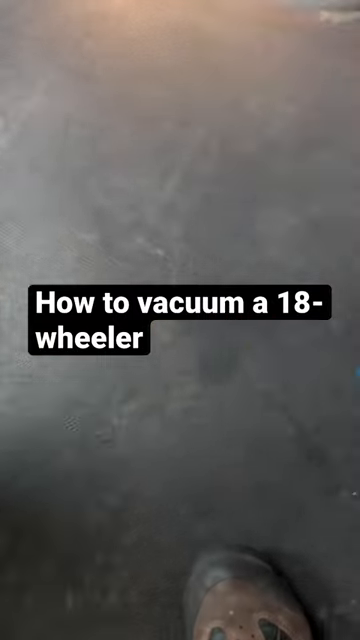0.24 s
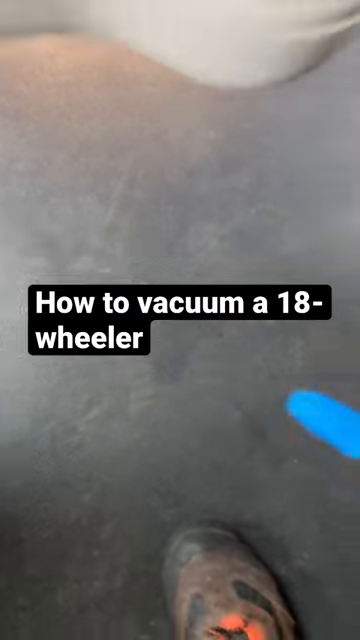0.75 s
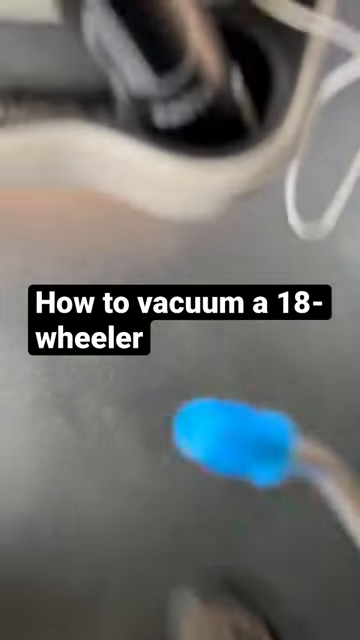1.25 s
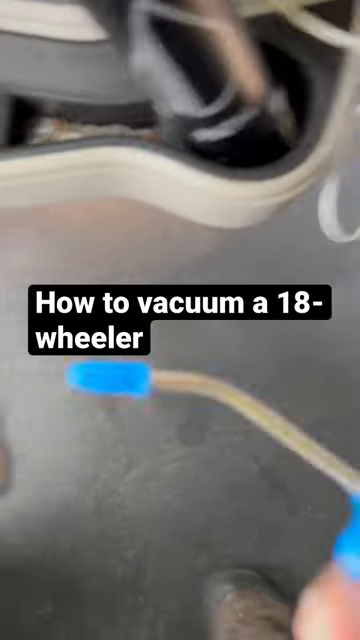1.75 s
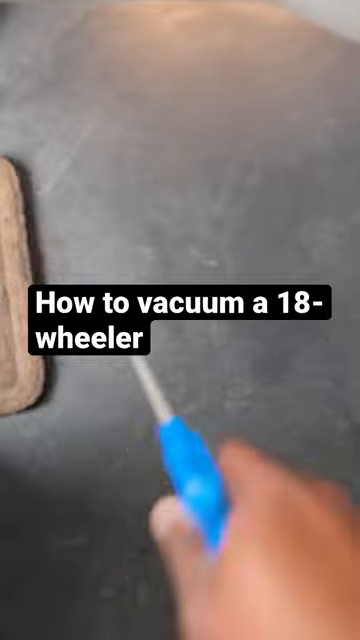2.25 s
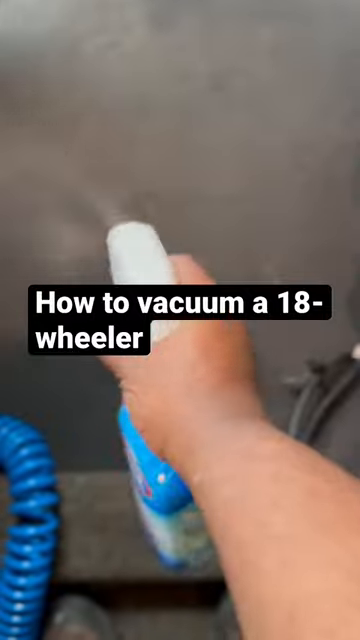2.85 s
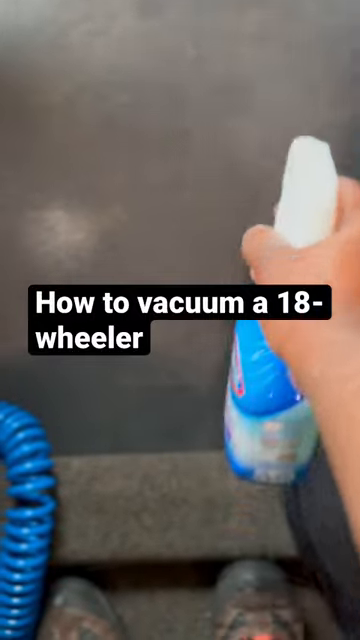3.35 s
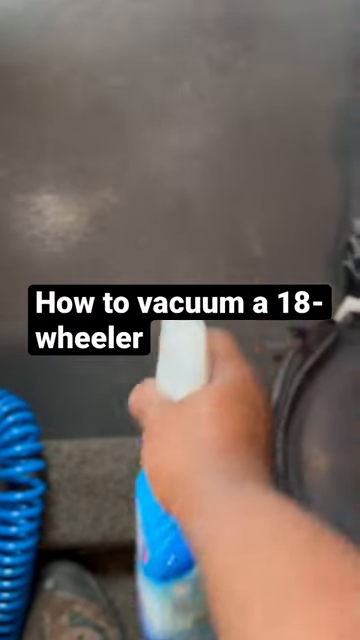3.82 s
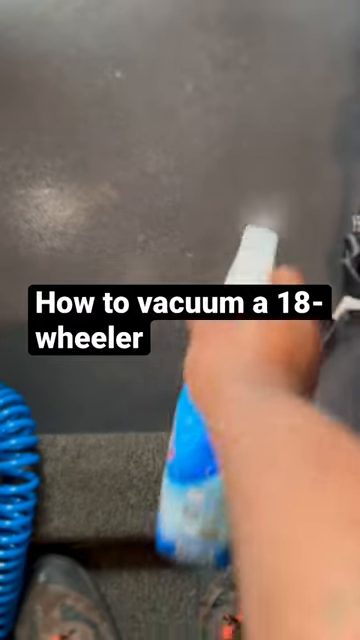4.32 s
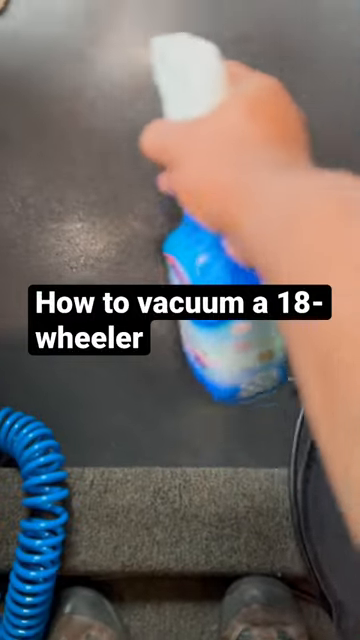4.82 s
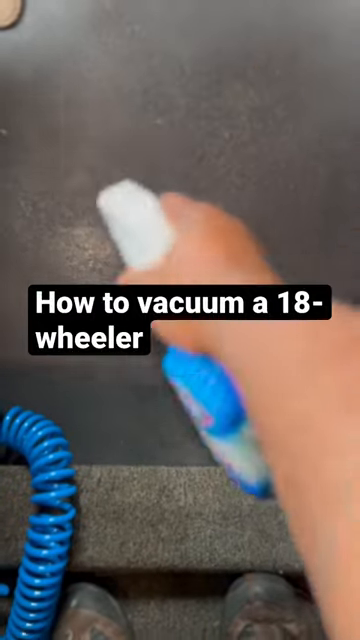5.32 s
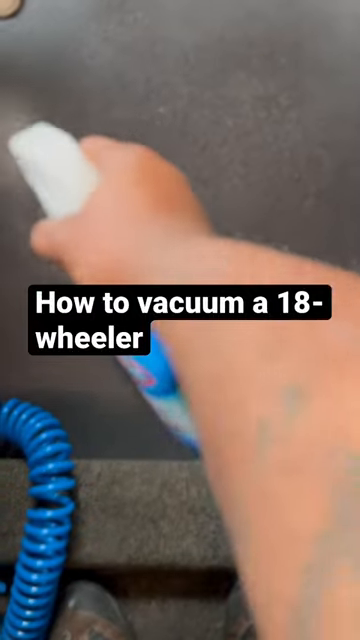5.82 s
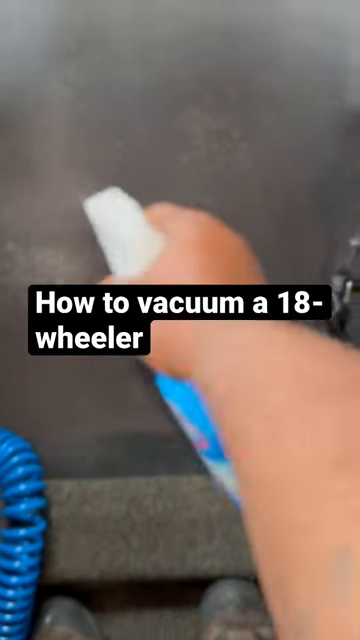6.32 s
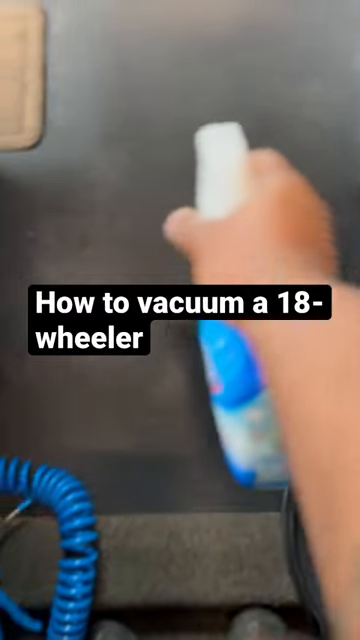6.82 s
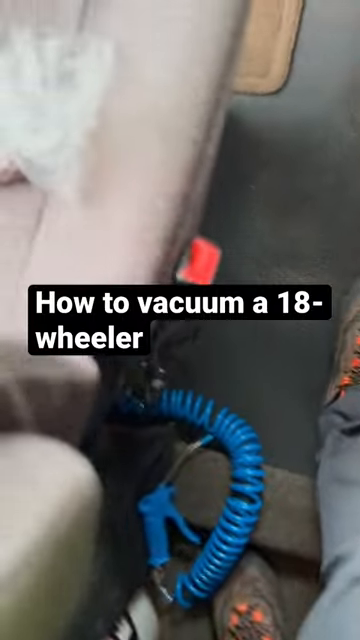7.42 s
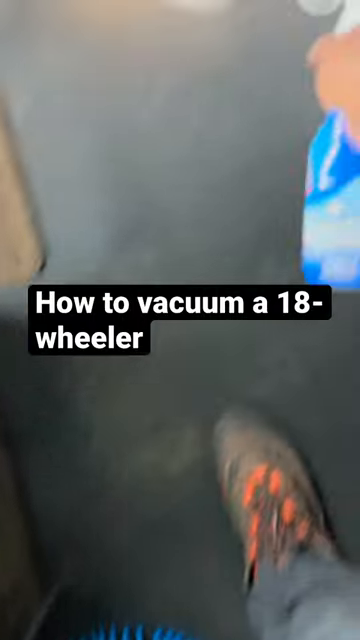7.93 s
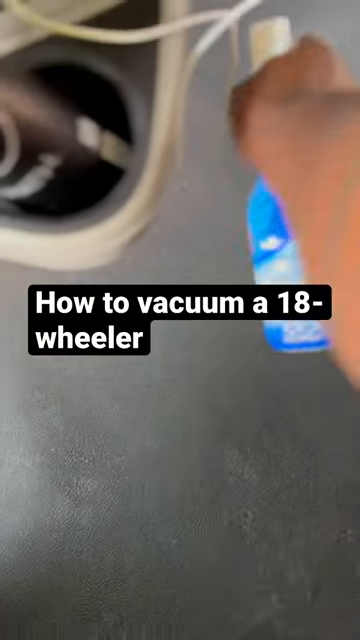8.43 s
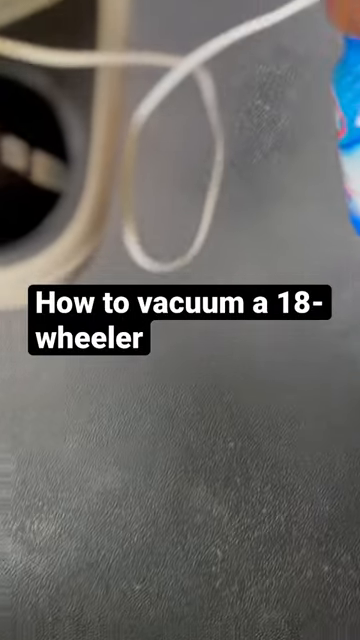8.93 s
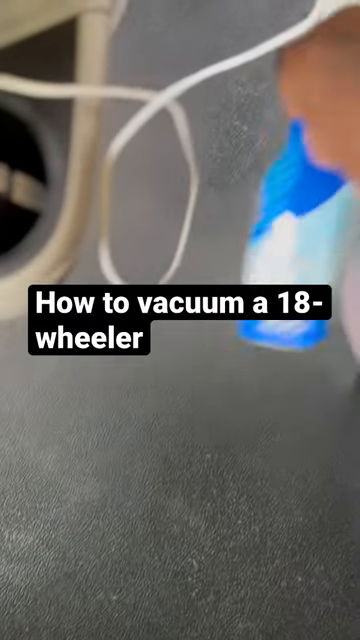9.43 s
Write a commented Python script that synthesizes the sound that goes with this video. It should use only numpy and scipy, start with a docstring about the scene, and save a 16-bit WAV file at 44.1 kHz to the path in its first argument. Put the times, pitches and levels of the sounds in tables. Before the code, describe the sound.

Inside a truck cab, a blow gun hisses loudly up close over a muffled diesel idle. Its air jet sweeps across the microphone in rough gusts, then weakens and sputters. The engine suddenly sounds louder, booming and clattering, while a trigger bottle sprays a quick run of short, misty squirts with small clicks. Cloth rustles with soft bumps and a plastic tap, then the spraying resumes over the idle.

```python
"""Cleaning a truck cab, engine idling.

A blow gun hisses close by, sweeps its air jet across the stereo microphone and sputters. Then the scene
changes: nearer the open door, a trigger bottle spits and mists cleaner stroke after stroke; in a pause the
driver shifts about and knocks something small. Under the floor a six-cylinder diesel booms throughout, muffled
at first, then louder by the door, where its valves clatter and its gears whine."""
import sys
import numpy as np
from scipy import signal
from scipy.fft import rfft, irfft, next_fast_len
from scipy.io import wavfile
from scipy.ndimage import uniform_filter1d, map_coordinates

SR = 44100
rng = np.random.default_rng(int(sys.argv[2]) if len(sys.argv) > 2 else 0)


def waveform_to_disk(signal):
    """Save audio, clipped to [-1, 1], as 16-bit WAV at the path in sys.argv[1]."""
    frames = np.transpose(np.atleast_2d(signal))
    scaled = np.clip(frames, -1, 1) * 32767
    samples = np.round(scaled).astype(np.int16)
    wavfile.write(sys.argv[1], SR, samples)


N = 426004
TIME = np.arange(N) / SR
DOOR_S = 2.425  # the scene changes here; the second scene is by the open door
CYCLE_S, FIRST_KNOCK_S = .2, .158  # all six cylinders fire once a cycle

# The engine at the microphone. Each row: time in seconds, then boom, body rumble and whirr in dB.
IDLE = [(0, -46.5, -50, -67), (1.1, -48, -48.5, -66), (1.7, -48, -55, -58), (1.85, -61, -62, -86),
        (2.42, -49, -55, -56), (2.43, -33.5, -36.5, -45), (3.0, -34, -35.5, -47.5),
        (3.7, -31.5, -34.5, -45), (4.9, -30, -33, -44), (5.9, -28.5, -32.5, -42.5),
        (6.9, -28, -31.5, -42.5), (7.42, -24.5, -30.5, -42.5), (7.75, -25.5, -29, -41.5),
        (8.4, -23.5, -27.5, -39.5), (9.0, -25, -28, -40.5), (9.66, -22, -27.5, -39.5)]
# How alike the left and right channels are. Each row: frequency in Hz, likeness from 0 to 1.
NEAR = [(100, 0.99), (400, 1), (850, 1), (1300, 1), (2200, 1), (3000, 0.43), (4700, 0.36), (5600, 0.7),
        (9300, 0.38), (10500, 1), (13600, 1), (14500, 0.6)]  # for sources close by
AROUND = [(60, 1), (130, 1), (250, 1), (500, 0.92), (950, 0.52), (1900, 0.88), (2600, 0.068), (5100, 0.11),
          (5700, 0.5), (9300, 0.72), (10500, 0.98), (13900, 1), (15000, .7)]  # for sound that fills the cab


def amp(db):
    return 10 ** (np.asarray(db) / 20)


def unit(x):
    return x / np.sqrt(np.mean(x ** 2) + 1e-20)


def along(points, hz):
    """Read (Hz, value) points on a log frequency axis."""
    freqs, values = np.transpose(points)
    return np.interp(np.log(hz + 1), np.log(freqs + 1), values)


def curves(rows):
    """One value per sample for each column after the time."""
    times, *columns = np.transpose(rows)
    return [np.interp(TIME, times, column) for column in columns]


def wobble(rate):
    """A smooth random curve, rate knots a second."""
    return map_coordinates(rng.standard_normal(int(N * rate / SR) + 4), [TIME * rate])


def filtered(x, response):
    """Filter x by a complex response of frequency."""
    size = next_fast_len(N + 8192)
    return irfft(rfft(x, size) * response(np.fft.rfftfreq(size, 1 / SR)), size)[..., :N]


def rush(spectrum, alike, patchy_db, source=None):
    """Stereo noise of rms 1 with patches of random gain; silent below its spectrum."""
    bins = signal.stft(rng.standard_normal((2, N)) if source is None else source, nperseg=512)[2]
    patches = uniform_filter1d(rng.standard_normal(bins.shape[1:]), size=6, axis=0)
    patches = uniform_filter1d(patches, size=8, axis=1)
    pair = signal.istft(bins * amp(patchy_db * unit(patches)), nperseg=512)[1][:, :N]
    closed = [(spectrum[0][0] / 2, -120), *spectrum]
    width = lambda hz: np.arccos(np.clip(along(alike, hz), 0, 1)) / 2
    mid, side = filtered(pair, lambda hz: amp(along(closed, hz)) * [np.cos(width(hz)), np.sin(width(hz))])
    return unit(np.array([mid + side, mid - side]))


def bursts(rows, rise, fall):
    """Envelope of (seconds, dB) bursts: a bell-shaped rise, an exponential fall."""
    out, t = np.zeros(N + SR), np.arange(-SR // 50, SR // 10) / SR
    shape = np.where(t < 0, np.exp(-(t / rise) ** 2), np.exp(-t / fall))
    for start, db in rows:
        out[max(round(start * SR) - SR // 50, 0):][:len(t)] += amp(db) * shape
    return out[:N]


def struck(start, db, hz, t60):
    """One decaying tone from a knock."""
    age = np.clip(TIME - start, 0, None)
    return amp(db - 60 * age / t60) * np.sin(2 * np.pi * hz * age)


def by_place(table):
    """Level curves in dB: the body rumble plus each row's value at the place the microphone faces."""
    # The microphone turns. Each row: time in seconds, place (0 door, 1 seat, 2 dashboard).
    facing = [(2.43, 0.066), (6.3, 0), (6.62, 1), (7.05, 1), (7.25, 1.3), (7.75, 1.63), (8.2, 2.04),
              (9.66, 2.08)]
    place, = curves(facing)
    return [curves(IDLE)[1] + np.interp(place, range(3), row) for row in table]


def blow_gun():
    """The nozzle hisses; the jet splashes on surfaces and buffets the microphone in gusts."""
    # Each row: time in seconds, then nozzle hiss, jet on surfaces and jet on the microphone in dB.
    sweep = [(0.0, -19.5, -43, -62), (0.2, -20.5, -43, -63), (0.37, -16, -33.5, -56),
             (0.47, -17.5, -36.5, -59), (0.63, -19, -42, -63), (0.75, -14, -28.5, -39),
             (0.84, -16.5, -33.5, -46), (0.9, -13.5, -22.5, -34.5), (1.0, -13.5, -29.5, -42),
             (1.09, -11.5, -24, -37), (1.105, -15, -17.5, -38), (1.125, -13, -19, -33),
             (1.15, -15, -17, -21.5), (1.22, -15, -16, -21), (1.27, -18, -16, -19),
             (1.31, -15.5, -16.5, -20.5), (1.35, -16.5, -22.5, -21), (1.385, -17, -21, -22.5),
             (1.45, -16, -17, -21), (1.52, -16, -20, -19.5), (1.58, -16, -18, -17), (1.63, -17, -19, -21),
             (1.68, -16.5, -22, -23), (1.73, -20.5, -28, -35.5), (1.76, -28, -50, -54),
             (1.8, -31, -60, -72), (2.0, -28.5, -51.5, -65), (2.035, -25, -37, -46),
             (2.09, -25, -39, -46.5), (2.135, -27, -46, -43), (2.19, -28, -51, -66),
             (2.27, -24.5, -46, -54), (2.295, -27, -58, -68), (2.33, -23, -38, -39), (2.4, -26.5, -54, -65),
             (2.425, -29.5, -49, -53)]
    # Each row: time in seconds, level in dB.
    air_slaps = [(2.034, -31), (2.056, -34), (2.066, -28), (2.076, -30), (2.088, -28), (2.098, -34),
                 (2.113, -36), (2.127, -34), (2.148, -31), (2.173, -44), (2.228, -31), (2.263, -33),
                 (2.27, -39), (2.317, -35), (2.332, -31), (2.36, -38)]  # the gun sputters
    head_on = [(1.04, -95), (1.08, -53), (1.14, -32.5), (1.2, -27), (1.3, -28.5), (1.37, -36), (1.48, -19),
               (1.52, -22), (1.57, -22.5), (1.63, -23), (1.68, -22.5), (1.72, -51), (1.75, -93)]  # a hollow roar when the jet points almost at the microphone
    # Spectra of the air. Each row: frequency in Hz, relative level in dB.
    nozzle_spectrum = [(900, -28), (2000, -11.5), (4000, -4.5), (6000, -1), (8000, -0.5), (10000, -1.5),
                       (13000, 0.5), (15500, 1.5)]
    splash_spectrum = [(200, -29), (600, -3), (1200, 0), (2400, 0.5), (4000, -4.5), (7000, -6),
                       (12000, -32)]
    buffet_spectrum = [(25, -26), (60, 0.5), (150, -1.5), (350, -5), (600, -6), (1200, -21.5)]
    roar_spectrum = [(130, -15), (260, -2.5), (390, 0.5), (520, -9), (800, -16), (1200, -60)]
    # How alike left and right are for the jet. Each row: frequency in Hz, likeness from 0 to 1.
    close = [(380, 1), (850, 0.89), (1300, 1), (2600, 1), (3400, 0.94), (4700, 0.81), (5600, 0.65),
             (9300, 1), (10500, 1)]
    hiss_db, splash_db, buffet_db = curves(sweep)
    treble_db = -2.5 - .27 * (splash_db - hiss_db)  # duller as the jet turns toward the microphone
    nozzle = rush(nozzle_spectrum, NEAR, patchy_db=1.5)
    treble = filtered(nozzle, lambda hz: 1 / (1 + (9000 / (hz + 1)) ** 6))
    hiss = amp(hiss_db + .63 * wobble(24.93)) * (nozzle + (amp(treble_db) - 1) * treble)
    gust = wobble(40.38)
    slaps = bursts(air_slaps, rise=.0007, fall=.002)
    thuds = amp(-7) * bursts(air_slaps, rise=.002, fall=.006)
    splash = (amp(splash_db + .7 * gust) + slaps) * rush(splash_spectrum, close, patchy_db=1.63)
    buffet = (amp(buffet_db + 1.9 * gust) + thuds) * rush(buffet_spectrum, close, patchy_db=1.5)
    roar = amp(curves(head_on)[0] + 1.1 * wobble(29.83)) * rush(roar_spectrum, close, patchy_db=2.5)
    return (TIME < DOOR_S) * (hiss + splash + buffet + roar)


def spray_bottle():
    """A squeeze spits trapped air and mists while the pump travels; the trigger clicks back."""
    # Each row: start and length in seconds, relative mist level in dB, click delay in seconds, click dB.
    strokes = [(2.544, .1, -43.5, .12, -45), (2.757, .079, -42.5, .121, -46),
               (2.957, 0.096, -42.5, 0.15, -51), (3.177, 0.093, -41.5, .14, -50),
               (3.384, 0.095, -40, .145, -43), (3.599, 0.096, -42.5, .148, -45),
               (3.863, .083, -41, .141, -46), (4.09, 0.095, -40.5, .154, -42), (4.333, .08, -39, .131, -42),
               (4.528, .091, -41, .148, -43), (4.739, 0.087, -40, .136, -51),
               (4.941, 0.095, -40.5, .143, -41), (5.152, .094, -39.5, .15, -41),
               (5.379, 0.081, -37.5, .146, -39), (5.607, 0.089, -38, .144, -44),
               (5.817, 0.092, -38.5, .144, -37), (6.021, 0.084, -37.5, .142, -46),
               (6.217, 0.07, -37, .144, -56), (8.027, 0.1, -40, .12, -40), (8.277, 0.11, -42.5, .17, -40),
               (8.542, .11, -41, 0.16, -42), (8.768, .11, -40.5, .156, -37),
               (9.004, 0.11, -38.5, .155, -39), (9.239, .1, -40, .168, -48), (9.624, 0.081, -40, .15, -48)]
    # Air escaping early in a stroke. Each row: time in seconds, relative peak in dB.
    spits = [(2.76, -38), (2.774, -42), (2.978, -37), (3.184, -28), (3.402, -26), (3.612, -25),
             (3.874, -36), (3.888, -34), (4.091, -33), (4.107, -24.5), (4.342, -27.5), (4.357, -38),
             (4.546, -26), (4.754, -32), (4.772, -32), (4.961, -23.5), (5.166, -26), (5.393, -23),
             (5.625, -24), (5.82, -31), (5.833, -32), (6.032, -27), (6.04, -30), (6.226, -31), (8.305, -27),
             (8.314, -29), (8.547, -33), (8.571, -26), (8.785, -21), (9.022, -23), (9.254, -21),
             (9.263, -27)]
    # Spectra of the spray. Each row: frequency in Hz, relative level in dB.
    mist_spectrum = [(1200, -8), (1900, -5), (2350, 0.5), (2900, -5.5), (3600, -4.5), (4300, -1.5),
                     (4800, -6), (5300, -7.5), (6500, -5), (8000, -8), (10000, -27)]
    fine_spectrum = [(6000, -18), (8000, -6.5), (10500, -3.5), (11500, -7), (13500, -6.5), (15500, -6.5)]
    spit_spectrum = [(3000, -24), (4500, -12), (6000, -7), (8000, -5), (9500, -2), (10800, 0), (11800, -7),
                     (15500, -5)]
    mist_on_dash = [(1200, -12), (2100, -2), (2700, -5), (3200, -2.5), (4000, -2), (4600, -3), (5100, -8),
                    (6000, -4), (8000, -7), (10000, -23)]
    spit_on_dash = [(3000, -30), (4500, -19), (6200, -14), (7400, -5), (8500, -4), (9500, -2), (10800, 0),
                    (11800, -7), (15500, -5)]  # thinner when aimed away
    before_dash = TIME < 7.5  # after this the bottle points at the dashboard
    usual_stroke_s, finer_db_per_s = .091, 114  # a slower stroke mists finer
    t = np.arange(SR // 4) / SR
    swell = amp(-3 * ((t - .05) / .067).clip(-2, 1) ** 2)
    linger = amp(-17.5) * np.exp(-t / .2)  # the nozzle fizzes on after a stroke
    coarse, fine = np.zeros((2, N + SR))
    for start, length, db, *_ in strokes:
        span = slice(round(start * SR), round(start * SR) + len(t))
        pressure = 1 / np.sqrt(1 + np.exp((t - length + .0074) / .0089))  # holds, then bleeds away
        fine_db = db + finer_db_per_s * (length - usual_stroke_s)
        coarse[span] += amp(db + 3) * (1 - np.exp(-t / .02)) * swell * pressure
        fine[span] += amp(fine_db) * (1 - np.exp(-t / .0022)) * (pressure + linger)
    spray = np.where(before_dash, rush(mist_spectrum, NEAR, patchy_db=2),
                     rush(mist_on_dash, NEAR, patchy_db=2))
    droplets = amp(.82 * wobble(300))
    fizz = rush(fine_spectrum, NEAR, patchy_db=2.5)
    mist = droplets * (coarse[:N] * spray + fine[:N] * fizz)
    spit_level = bursts(spits, rise=.003, fall=.007) * amp(1.5 * wobble(700) - 2.5)
    spit = spit_level * np.where(before_dash, rush(spit_spectrum, NEAR, patchy_db=3),
                                 rush(spit_on_dash, NEAR, patchy_db=3))
    releases = [(start + delay, db) for start, *_, delay, db in strokes]
    clicks = bursts(releases, rise=.001, fall=.006) * fizz
    return mist + spit + clicks


def engine_boom():
    """The cab booms at twice the firing rate; a weaker hum beats against it, with tones alongside."""
    # Pitches in Hz of the tones heard once near the door.
    orders_hz = [30, 90, 122.9, 166.2]
    # Each row: one tone's dB over the body rumble at door, seat, dashboard.
    orders_db = [(-7.5, -8, -14), (-6.5, -5.5, -6.5), (-3.5, -8.5, -11), (-20, -16.5, -9.5)]
    boom_hz, hum_hz, in_step_s = 2 * 6 / CYCLE_S, 61.43, 7.18
    dip_db = -17 * np.exp(-((TIME - 7.57) / .059) ** 2)  # the boom drops out briefly
    phase_per_hz = 2 * np.pi * (TIME - in_step_s)
    beating = np.sin(boom_hz * phase_per_hz) + amp(-12.5) * np.sin(hum_hz * phase_per_hz)
    boom = np.sqrt(2) * amp(curves(IDLE)[0] + dip_db + .72 * wobble(12)) * beating
    for hz, db in zip(orders_hz, by_place(orders_db)):
        level = (TIME > DOOR_S) * amp(db + 1.1 * wobble(5.8))
        boom += level * np.sin(2 * np.pi * hz * TIME + .83 * wobble(3.3))
    return boom * amp([[-.12], [.12]])


def cycle_noise():
    """White noise of which a share repeats, slowly changing, every engine cycle."""
    # Each row: frequency in Hz, repeating share from 0 to 1.
    share = [(150, .15), (300, .25), (480, .55), (900, .55), (1300, .1)]
    drift = .5 * wobble(.693)
    one_cycle = rng.standard_normal((2, 2, round(CYCLE_S * SR)))
    one, other = np.tile(one_cycle, int(N / SR / CYCLE_S) + 1)[..., :N]
    repeating = filtered(np.cos(drift) * one + np.sin(drift) * other, lambda hz: along(share, hz) ** .5)
    fresh = filtered(rng.standard_normal((2, N)), lambda hz: (1 - along(share, hz)) ** .5)
    return repeating + fresh


def engine_rumble():
    """The body rumbles and the engine whirrs in step with the firings."""
    # Each row: frequency in Hz, relative level in dB.
    body_spectrum = [(22, -30), (43, -7), (65, -9), (86, -7), (150, -12.5), (275, -13.5), (330, -19.5),
                     (450, -18.5), (550, -21), (690, -25), (880, -24), (1040, -31), (1260, -34),
                     (1600, -63)]
    whirr_spectrum = [(900, -7), (1250, 0.5), (1550, -7.5), (2200, -6), (3300, -10.5), (4200, -15.5),
                      (5300, -19), (5800, -16.5), (8000, -20.5), (10800, -21), (12000, -31), (15500, -29)]
    _, body_db, whirr_db = curves(IDLE)
    firing = 2 * np.pi * 6 * (TIME - FIRST_KNOCK_S - .008) / CYCLE_S
    beat = np.cos(firing) + .65 * np.cos(firing / 2) + .29 * np.cos(firing / 3)
    body_level = amp(body_db + .23 * beat + .55 * wobble(12))
    body = body_level * rush(body_spectrum, AROUND, patchy_db=.5, source=cycle_noise())
    whirr = rush(whirr_spectrum, AROUND, patchy_db=1) * amp(whirr_db + .67 * beat + .68 * wobble(8))
    return body + whirr


def engine_chuff():
    """Ten muffled puffs in the first second."""
    puffs = [(.0384 + k * .099, -41.5 + 1.5 * rng.standard_normal()) for k in range(10)]
    return bursts(puffs, rise=.0098, fall=.012) * np.sin(2 * np.pi * 200 * TIME + 2 * wobble(21.3))


def valve_clatter():
    """Valves and injectors strike once a cycle, each with its own ring."""
    # Each row: ms after the first knock, ring in Hz, dB over the body rumble at door, seat, dashboard.
    parts = [(0, 675, 4.5, -2, -1), (12.07, 900, -6, -9, -12), (28.06, 950, -9, -9, -16),
             (58, 880, -10, -11, -13), (150, 910, -7, -10, -9), (2.02, 850, -10, -2, -11),
             (37.9, 825, -9, -4, -11), (139.5, 760, -8, -7, -10), (20.08, 705, 0, -4, -6),
             (29.94, 660, -5, -10, 1), (50.1, 700, -3, -5, -7), (67.7, 1270, -8, -5, -16),
             (70, 720, -4, -8, -3), (95, 765, 0.5, -8, -4), (98, 825, -10, -1, -9), (110, 705, 2, -3, -11),
             (128, 715, -3, -4, -8), (165.3, 640, -5, -5, -1), (175.5, 770, 0.5, -7, -2)]
    cycle_starts = FIRST_KNOCK_S + CYCLE_S * np.arange(int(N / SR / CYCLE_S) - 1)
    t, t60 = np.arange(SR // 8) / SR, .085
    envelope = amp(-60 * t / t60) * (1 - np.exp(-t / .00087))
    levels = by_place([row[2:] for row in parts])
    out = np.zeros((2, N))
    for k, (ms, ring_hz, *_) in enumerate(parts):
        jitter, force = rng.standard_normal((len(cycle_starts), 2)).T
        strikes_s = cycle_starts + (ms + .05 * jitter) / 1000
        blows = np.zeros(N)
        blows[(strikes_s * SR).astype(int)] = amp(.97 * force)
        lead = (-1) ** k * .31 * np.array([[1], [-1]])  # the parts lie left and right in turn
        ring = envelope * np.sin(2 * np.pi * ring_hz * t + lead)
        out += signal.fftconvolve((amp(levels[k]) * blows)[None], ring, axes=1)[:, :N]
    return out


def seat_hollow():
    """The space under the seat rings with the engine."""
    # Each row: frequency in Hz, relative level in dB.
    resonance = [(720, -30), (780, -3), (830, 0), (900, -3), (960, -9), (1020, -40), (1200, -120)]
    # One row: dB over the body rumble at door, seat, dashboard.
    hollow_db = [(-22, -9, -20)]
    return amp(by_place(hollow_db)[0]) * rush(resonance, AROUND, patchy_db=1, source=cycle_noise())


def gear_whine():
    """The gears whine under load; every other firing pushes harder."""
    # Pitches in Hz, whole multiples of the cycle rate.
    gears_hz = [720, 1290, 700, 750, 810, 920]
    # Each row: one whine's dB over the body rumble at door, seat, dashboard.
    gears_db = [(-40, -32, -10.5), (-21, -24, -29), (-19, -20, -20), (-20, -34, -26), (-34, -15, -30),
                (-30, -22, -25)]
    load = 1 + .65 * np.cos(2 * np.pi * 3 * (TIME - FIRST_KNOCK_S - .012) / CYCLE_S)
    return load * sum(amp(db + .6 * wobble(6)) * np.sin(2 * np.pi * hz * TIME + .15 * wobble(3))
                      for hz, db in zip(gears_hz, by_place(gears_db)))


def driver_shifting():
    """Cloth rustles dully among scrapes, soft bumps on the seat and one short plastic ring."""
    # Start in seconds, level in dB, pitch in Hz, seconds to fall 60 dB.
    plastic_tap = (7.646, -35, 3550, .022)
    # Each row: start in seconds, peak in dB, pitch in Hz.
    seat_bumps = [(7.011, -21, 230), (7.225, -27, 200), (7.316, -25, 500), (7.383, -27, 280)]
    # Each row: time in seconds, peak in dB, rise and fall time in seconds.
    scuffs = [(7.385, -44, .012), (7.41, -40, .01), (7.437, -43, .008), (7.505, -38, .0015),
              (7.53, -41, .002), (7.647, -38, .002), (7.657, -37, .002), (7.672, -42, .01),
              (9.505, -46, .012)]
    # Each row: time in seconds, rustle level in dB.
    movement = [(6.9, -97), (6.95, -55), (7.0, -43), (7.07, -45), (7.12, -51), (7.22, -41), (7.32, -39),
                (7.4, -33.5), (7.5, -37), (7.58, -43), (7.7, -60)]
    # Each row: frequency in Hz, relative level in dB.
    scrape_spectrum = [(900, -12), (2000, 0), (3000, -3), (4200, -10), (6500, -12), (9000, -22),
                       (11000, -60)]
    cloth_spectrum = [(120, -11), (200, 1), (350, -2.5), (550, -7), (700, -6), (1000, -31), (1500, -67)]
    bumps = sum(struck(*bump, t60=.06) for bump in seat_bumps)
    scrape_level = sum(bursts([(start, db)], rise=edge, fall=edge) for start, db, edge in scuffs)
    scrapes = scrape_level * rush(scrape_spectrum, NEAR, patchy_db=1)
    rustle = amp(curves(movement)[0] + 2.5 * wobble(35)) * rush(cloth_spectrum, AROUND, patchy_db=1.5)
    return struck(*plastic_tap) + bumps + scrapes + rustle


def scene():
    """The cleaning up close over the idle; the engine's finer sounds come in by the door."""
    cleaning = blow_gun() + spray_bottle()
    idle = engine_boom() + engine_rumble() + engine_chuff()
    by_door = (TIME > DOOR_S) * (valve_clatter() + seat_hollow() + gear_whine())
    return cleaning + idle + by_door + driver_shifting()


def record(dry):
    """Left and right drift apart in phase in the treble; peaks round off; the top is cut."""
    # Each row: frequency in Hz, the right channel's phase lead in half turns.
    right_lead = [(5500, 0), (7500, .4), (9300, .7), (10500, 1), (13700, 1), (14500, 1.25), (15700, 1.45)]  # held opposite from 10.5 to 13.7 kHz
    full_scale, top_hz = .95, 15850
    shifted = filtered(dry, lambda hz: np.exp([[-.5j], [.5j]] * (np.pi * along(right_lead, hz))))
    rounded = shifted / (1 + np.abs(shifted / full_scale) ** 6) ** (1 / 6)
    return filtered(rounded, lambda hz: hz < top_hz)


dry = scene()
out = record(dry)
waveform_to_disk(out)
```